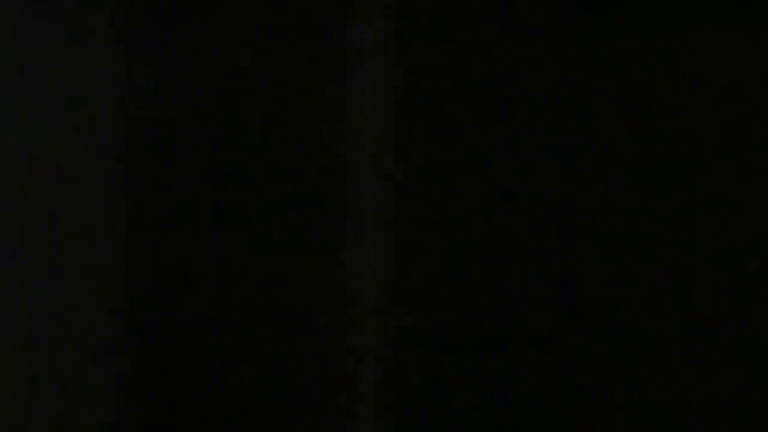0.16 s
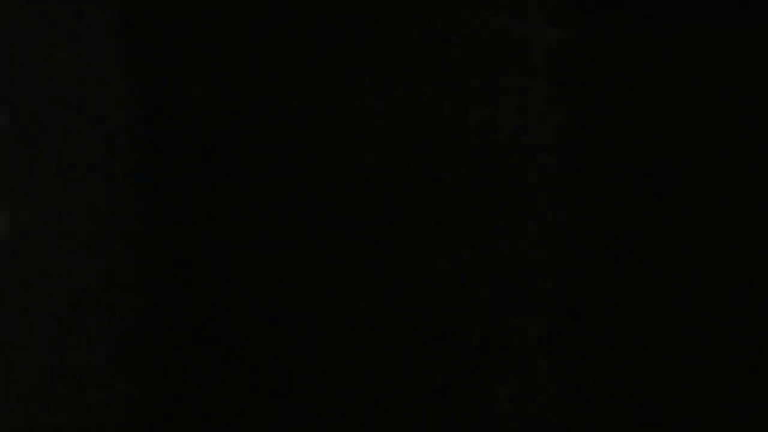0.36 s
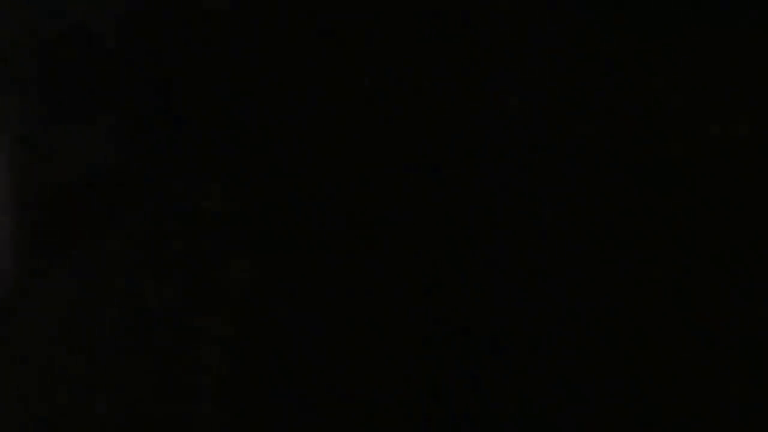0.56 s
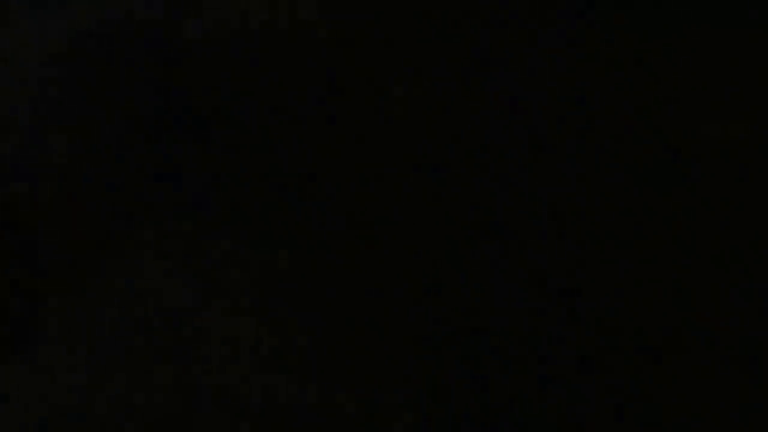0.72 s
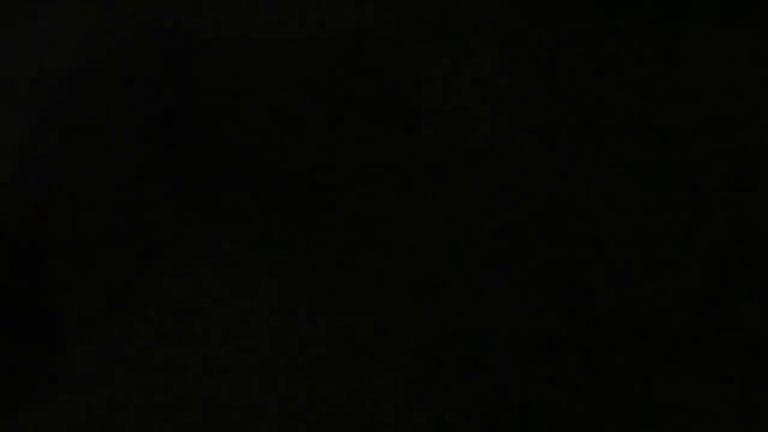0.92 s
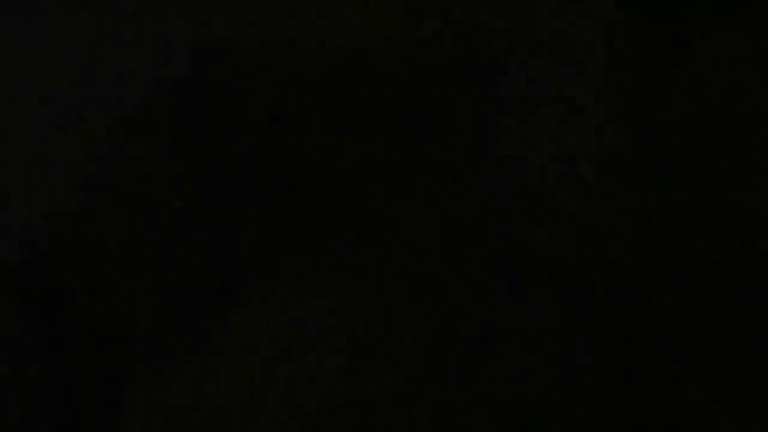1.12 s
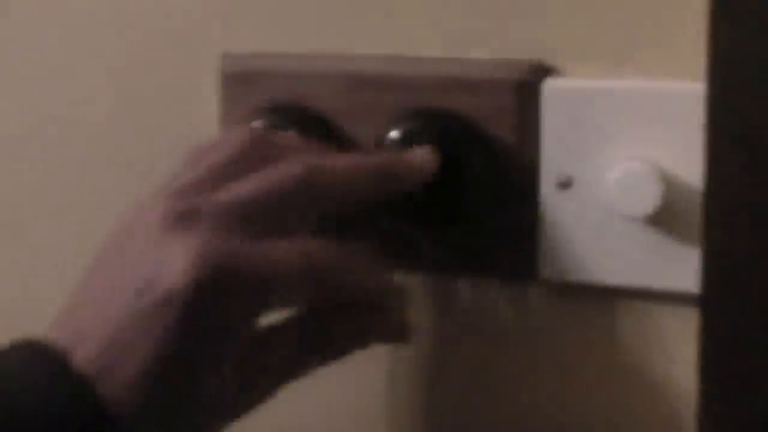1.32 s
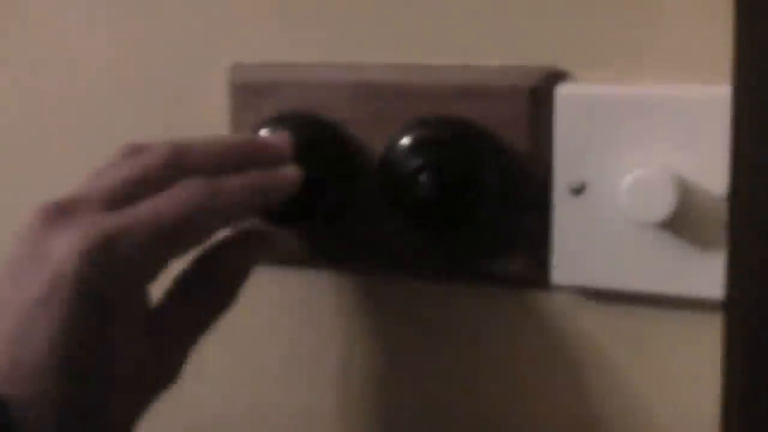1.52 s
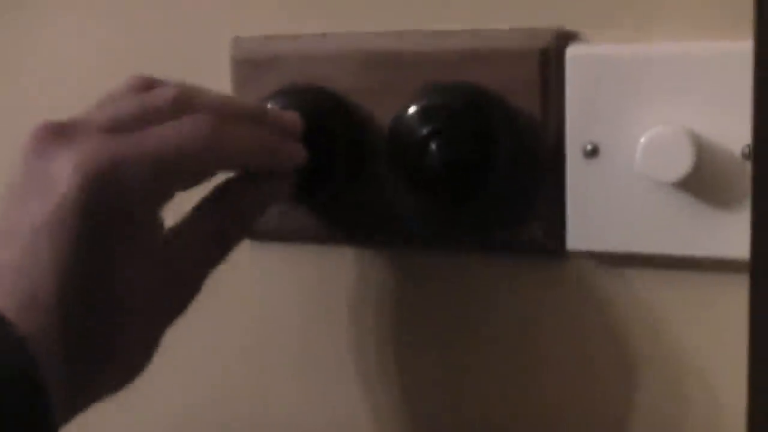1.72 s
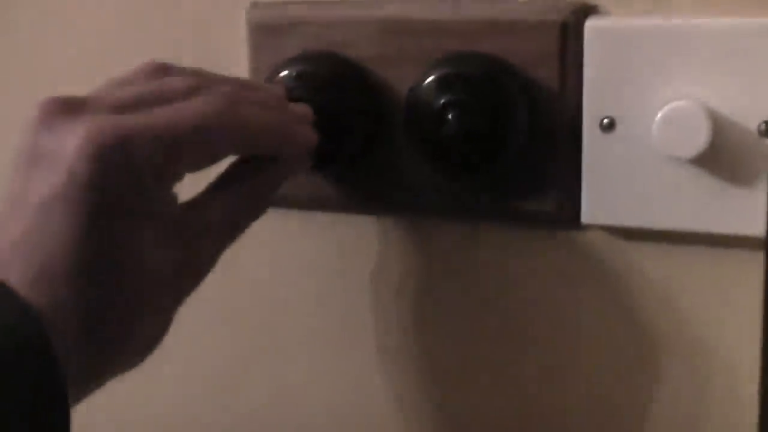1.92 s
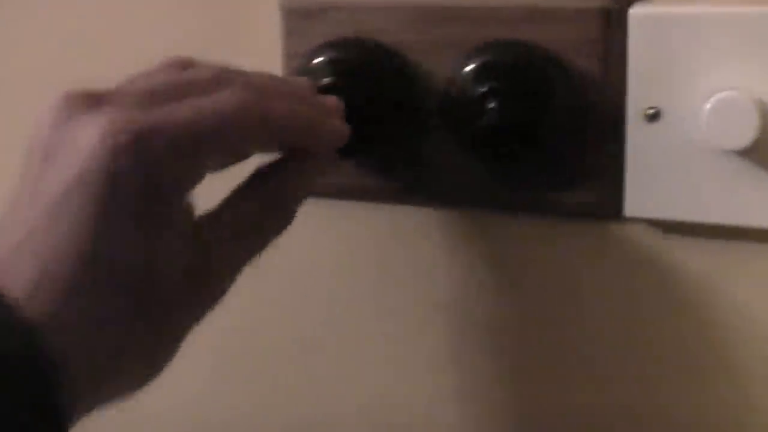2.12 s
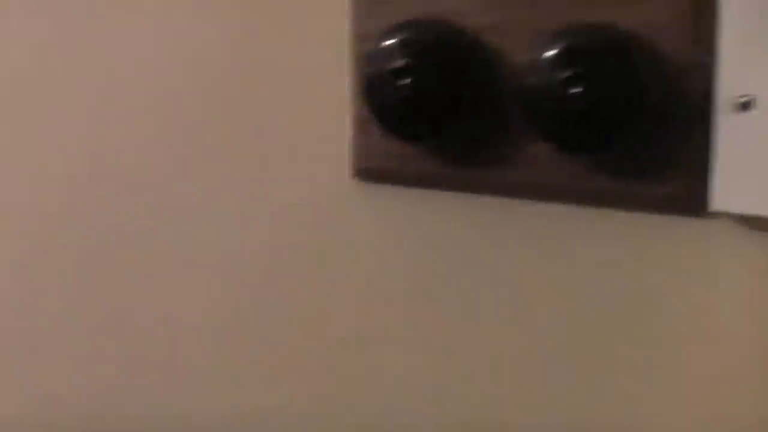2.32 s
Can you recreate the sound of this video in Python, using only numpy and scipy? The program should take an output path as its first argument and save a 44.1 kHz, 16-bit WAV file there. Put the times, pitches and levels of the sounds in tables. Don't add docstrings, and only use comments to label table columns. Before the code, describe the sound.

Sharp clicks of an old light switch, with sleeve rustle and hand knocks before them

```python
import sys
import numpy as np
from scipy import signal
from scipy.fft import irfft
from scipy.io import wavfile
from scipy.ndimage import uniform_filter1d, minimum_filter1d

SR = 44100
rng = np.random.default_rng(int(sys.argv[2]) if len(sys.argv) > 2 else 0)


def gain_from_db(level_db):
    decades = np.asarray(level_db, float) / 20
    return 10 ** decades


def output_pcm(signal):
    pcm = np.clip(np.atleast_2d(signal).T, -1, 1) * 32767
    wavfile.write(sys.argv[1], SR, np.round(pcm).astype(np.int16))


N = 104296

# pitch_hz, density_db_per_hz
HUSH = [(15, -50), (50, -14), (100, -18.5), (195, -12), (309, -20.5), (2160, -25), (2480, -35),
        (2760, -25.5), (14400, -47), (16000, -52)]
HUSH_DB = -56
# time_s, level_db
SLEEVE = [(0, -45), (.075, -46), (.1, -45.5), (.21, -45.5), (.3, -47.5), (.37, -51), (.5, -52),
          (.525, -48.5), (.72, -49.5)]
# pitch_hz, density_db_per_hz
CLOTH = [(180, -28), (300, 3), (366, -0.5), (1100, -5), (1810, -2.5), (2400, -3), (4230, -6), (7820, -12),
         (16000, -24.5)]
# pitch_hz, width_hz, gain, start_s, end_s
FOLDS = [
    (1780, 300, 1.5, 0.18, 0.342),
    (1620, 170, 1.7, 0.314, .5),
    (3330, 230, 1.3, 0.07, 0.327),
    (4300, 200, 1.8, .08, .36),
    (8400, 1060, 1.2, 0.074, 0.297),
    (2720, 1050, 0.83, 0.523, 0.75),
]
FOLD_EASE_S = 0.02
# time_s, level_db
SWIPE = [(0.62, -78), (0.674, -54.5), (0.766, -42), (0.838, -42), (1.0, -56.5)]
# pitch_hz, density_db_per_hz
SKIN = [(180, -25), (300, -23), (1140, -12), (1480, -10.5), (1690, -5.5), (1840, -12.5), (2140, -6),
        (8790, -23), (16000, -37.5)]
# pitch_hz, width_hz, level_db
WALL = [(990, 75, -17), (1460, 77, -11), (1862, 82, -4), (1996, 92, -11.5), (2700, 130, -6.5),
        (2960, 230, -7)]
# start_s, level_db, patch_hz, patch_db, patch_t60_s
KNOCKS = [(0.039, -37, 150.4, -2.5, 0.17), (0.111, -38.5, 1100, 25, 0.0058), (.145, -51, 800, 21.5, 0.025),
          (0.3644, -27, 563, 1.5, 0.031), (.367, -36, 1036, 8, .03), (.372, -35, 141, 6.5, 0.092),
          (0.386, -32.5, 300, -2.5, 0.046), (0.402, -33, 490, 0, 0.034), (0.415, -34.5, 180, 3.5, 0.062),
          (0.421, -24.5, 630, 6.5, 0.013), (.424, -42, 1170, 12, .03), (.428, -30, 165, 2, .08),
          (.441, -31, 470, 8, 0.038), (.454, -30, 620, 2, 0.028), (.458, -29.5, 390, 4, 0.082),
          (.467, -30.5, 170, 9, 0.028), (.485, -34, 276, 7.5, 0.092), (0.504, -37.5, 337, 1, 0.053),
          (0.527, -41.5, 200, 3, 0.067), (0.6, -45, 800, 13, 0.023), (.603, -46, 880, 13, .044),
          (.612, -50, 887, 15, .044), (.624, -52, 1000, 14, .03), (.622, -46.5, 1460, 13, 0.044),
          (0.744, -43.5, 990, 15.5, 0.061), (1.295, -49.5, 650, 22.5, 0.038), (1.363, -44, 279, 18, 0.031),
          (1.97, -42, 402, 6, 0.12), (2.03, -47, 400, 8, 0.1), (2.06, -48, 308, 10, 0.13),
          (2.1, -50, 420, 10, .09)]
# pitch_hz, level_db, t60_s
PLATE = [(79.5, -3, 0.11), (127.5, -5, 0.059), (159.4, -4.5, 0.055), (247.3, -7.5, 0.089),
         (390, -5.5, 0.07), (478, -12.5, 0.056), (620, -1, 0.015), (182, -6, .08), (1100, -14, 0.02),
         (1618, -15, .03)]
MOST_CYCLES = 40
# pitch_hz, t60_s
HALL_T60 = [(200, 0.82), (600, 0.38), (1400, 0.68), (4000, 0.63), (10000, 0.47), (16000, 0.25)]
# pitch_hz, density_db_per_hz
HALL_COLOUR = [(100, -12), (300, -5.5), (1000, -2.5), (2000, -8), (4200, -3), (8700, -11), (12500, -16.5),
               (16000, -12.5)]
EARLY_DB, EARLY_T60_S, HALL_SIDE_DB = -1, 0.091, -8.5
BUILD_S = 0.044
# start_s, level_db, lever_hz, contact_hz, shell_db
TICKS = [(0.0652, -32.5, 5900, 6400, -30), (0.0656, -27, 5000, 8800, -22), (0.07, -8, 4770, 4150, -16),
         (0.0707, -21, 6500, 8950, -12), (0.072, -23, 4600, 3700, -13), (0.074, -25, 2510, 3080, -20),
         (1.1840, -43, 4200, 6360, -6), (1.1865, -41, 4600, 6700, -4), (1.295, -56, 2500, 2600, -25),
         (1.2964, -5.5, 4140, 3000, -7), (1.2961, -10, 3960, 2640, -4.5), (1.2969, -18.5, 2030, 10500, 0),
         (1.2971, -14, 6610, 6550, -3), (1.2977, -10.5, 3900, 8600, -17), (1.2993, -24, 4200, 6600, -21),
         (1.3043, -24, 4200, 7000, -14), (1.7602, -39.5, 3840, 7760, -7), (1.7610, -37, 3230, 5170, -11),
         (1.7614, -41, 1870, 8000, -5), (1.966, -10, 4330, 5500, -10), (1.9665, -10, 3600, 2900, -18),
         (1.9674, -18, 1400, 5500, -11), (1.9674, -7.5, 3750, 6400, -3), (1.968, -12.5, 3500, 6700, -6),
         (1.971, -37, 3700, 6800, -15), (1.9792, -34, 4000, 6800, -14)]
LEVER_T60_S, CONTACT_T60_S, CONTACT_DB, TICK_PAN_DB = 0.0063, 0.0032, 2, 1.8
# pitch_hz, level_db, t60_s
SHELL = [(1400, -15.5, 0.0083), (2390, -10.5, 0.0014), (5500, 7, 0.00084), (7100, -31, 0.0011),
         (9080, 0.5, 0.0027), (10900, -4.5, 0.004), (13300, -3, 0.0026)]
# start_s, level_db, cap_hz, cap_gain, tilt_db_per_octave
SNAPS = [
    (0.069, 1, 8500, 0.88, 1.1),
    (1.187, -32.5, 6500, 0.68, 6),
    (1.297, 7, 8330, 4.3, -0.07),
    (1.762, -48, 7940, .5, 13),
    (1.968, 6.5, 6800, 1.7, 1.53),
]
CAP_WIDTH_HZ, BASE_HZ, BASE_WIDTH_HZ, BASE_GAIN = 2040, 4200, 320, 2.46
# time_s, pitch_hz, level_db
WHINE = [(0.98, 2490, -54), (1.08, 2585, -57), (1.159, 2545, -58.5), (1.2, 2494, -50.5), (1.295, 2510, -55),
         (1.42, 2440, -71), (1.55, 2390, -65), (1.58, 2410, -58.5), (1.63, 2490, -54.5), (1.84, 2444, -55),
         (1.865, 2440, -63), (1.96, 2440, -63), (2.05, 2430, -74), (2.22, 2380, -74), (2.27, 2380, -57),
         (2.32, 2436, -53.5), (2.37, 2420, -54)]
WHINE_WIDTH_HZ, WHINE_PAN_DB = 67, -6.5
STEADY = 0.8
# time_s, left_minus_right_db
HAND = [(0, -1), (.05, 1.5), (.27, 3.5), (.43, -1), (.58, -2.5), (.8, -2), (1.1, -2.5), (1.3, -0.5),
        (1.4, 1), (1.75, -7), (2, 0), (2.36, -3)]
BASS_CUT_HZ = 121
NOTCH_HZ, NOTCH_WIDTH_HZ, NOTCH_DEPTH = 9380, 250, 0.7
LIMIT_DB, SQUEEZE, ATTACK_S, HOLD_S, RELEASE_DB_PER_S = -26, 0.74, 0.0064, 0.037, 389


def evened(x):
    return x / np.sqrt(np.mean(x ** 2) + 1e-20)


def read(points, hz):
    f, value = np.transpose(points)
    return np.interp(np.log(hz + 1), np.log(f + 1), value)


def follow(curve, column=1, fade_db_per_s=150):
    t, c = np.arange(N) / SR, np.array(curve)
    outside_s = np.maximum(c[0, 0] - t, 0) + np.maximum(t - c[-1, 0], 0)
    return gain_from_db(np.interp(t, c[:, 0], c[:, column]) - fade_db_per_s * outside_s)


def add(mix, s, sound):
    part = mix[:, round(s * SR):][:, :sound.shape[1]]
    part += sound[:, :part.shape[1]]


def panned(x, pan_db):
    return x * gain_from_db(np.array([[0.5], [-0.5]]) * pan_db)


def ring(modes, length_s, spread=0.0, soft_s=0.0001):
    t = np.arange(0, length_s, 1 / SR)
    out = np.zeros(len(t))
    for hz, db, t60 in modes:
        level_turn, phase_turn = rng.uniform(-1, 1, 2)
        decay = gain_from_db(db + 4.8 * spread * level_turn - 60 * t / t60)
        out += decay * np.sin(2 * np.pi * hz * t + 3 * spread * phase_turn)
    return out * (1 - np.exp(-t / soft_s))


def resonate(x, hz, width):
    turn = np.exp(2j * np.pi * np.cumsum(hz * np.ones(N)) / SR)
    r = np.exp(-np.pi * width / SR)
    return 2 * (turn * signal.lfilter([1 - r], [1, -r], x / turn)).real


def noise(colour, side_db, patchy_db):
    hz = np.fft.rfftfreq(512, 1 / SR)
    a, b, c, d, patches = rng.standard_normal((N // 128 + 5, 257, 5)).T
    patches = uniform_filter1d(patches, size=5, axis=0)
    patches = evened(uniform_filter1d(patches, size=8, axis=1))
    mid, side = a + 1j * b, gain_from_db(side_db) * (c + 1j * d)
    z = np.array([mid + side, mid - side]) * gain_from_db(read(colour, hz)[:, None] + patchy_db * patches)
    return evened(signal.istft(z, nperseg=512, noverlap=384)[1][:, :N])


def room_hush():
    return gain_from_db(HUSH_DB) * noise(HUSH, side_db=-3, patchy_db=2.5)


def rubbing():
    t = np.arange(N) / SR
    cloth = noise(CLOTH, side_db=-7.5, patchy_db=2.0)
    folds = 0
    for hz, width, gain, start, end in FOLDS:
        tightness = np.clip(np.minimum(t - start, end - t) / FOLD_EASE_S + 0.5, 0, 1)
        folds = folds + gain * tightness * resonate(cloth, hz, width)

    skin = noise(SKIN, side_db=-10.0, patchy_db=0.6)
    catches = rng.random(N) < 6000 / SR
    strength = gain_from_db(1.5 * np.minimum(rng.exponential(1, N), 3))
    mid, side = rng.standard_normal((2, N)) * strength * catches
    slips = mid + gain_from_db(-10) * side * np.array([[1], [-1]])
    rung = 0
    for hz, width, db in WALL:
        patch = resonate(resonate(slips, hz, width), hz, 2 * width)
        rung = rung + gain_from_db(db) * evened(patch)
    return follow(SLEEVE) * gain_from_db(3.5) * (cloth + folds) + follow(SWIPE) * gain_from_db(8.0) * (skin + rung)


def hall(x):
    taps = np.zeros((2, SR))
    at = np.arange(160, SR - 10, 10)
    at = at + rng.integers(0, 10, (2, len(at)))
    np.put_along_axis(taps, at, rng.choice([-1., 1.], at.shape), axis=1)
    hz, t, z = signal.stft(taps, SR, nperseg=128)
    late = gain_from_db(-60 * t / read(HALL_T60, hz)[:, None]) * (1 - np.exp(-t / BUILD_S))
    early = gain_from_db(EARLY_DB - 60 * t / EARLY_T60_S)
    mid, side = signal.istft(z * (late + early), SR, nperseg=128)[1]
    side = side * gain_from_db(HALL_SIDE_DB)
    echoes = np.array([mid + side, mid - side]) / np.linalg.norm(mid)
    return signal.fftconvolve(x[None], echoes, axes=1)


def knocks():
    out = np.zeros((2, N))
    for s, db, hz, patch_db, t60 in KNOCKS:
        patch = (hz, patch_db, min(t60, MOST_CYCLES / hz))
        blow = ring(PLATE + [patch], 0.33, spread=0.33, soft_s=0.00094)
        add(out, s, gain_from_db(db) * blow[None])
    return out + gain_from_db(-11.5) * hall(out[0])[:, :N]


def switch():
    out = np.zeros((2, N))
    for s, db, lever_hz, contact_hz, shell_db in TICKS:
        tick = ring([(lever_hz, 0, LEVER_T60_S), (contact_hz, CONTACT_DB, CONTACT_T60_S)], 0.02)
        tick = tick + gain_from_db(shell_db) * ring(SHELL, 0.02, spread=0.3)
        pan_db = TICK_PAN_DB + 5.9 * rng.uniform(-1.1, 1)
        add(out, s, panned(gain_from_db(db) * tick, pan_db))

    hz, middle_s = np.fft.rfftfreq(256, 1 / SR), 128 / SR
    for s, db, cap_hz, cap_gain, tilt_db in SNAPS:
        cap = cap_gain / (1 + ((hz - cap_hz) / CAP_WIDTH_HZ) ** 2)
        base = BASE_GAIN / (1 + ((hz - BASE_HZ) / BASE_WIDTH_HZ) ** 2)
        tilt = tilt_db * np.log2((hz + 1) / BASE_HZ)
        colour = (1 + cap + base) * gain_from_db(read(HALL_COLOUR, hz) + tilt)
        click = np.fft.fftshift(irfft(colour)) / np.sqrt(np.mean(colour ** 2))
        add(out, s - middle_s, gain_from_db(db) * hall(click))
    return out


def motor():
    s, hz, _ = np.transpose(WHINE)
    hz = np.interp(np.arange(N) / SR, s, hz)
    x = noise([(100, 0), (16000, 0)], side_db=-10, patchy_db=1.5)
    pair = resonate(x, hz - 55, WHINE_WIDTH_HZ) - resonate(x, hz + 55, WHINE_WIDTH_HZ)
    tone = resonate(pair, hz, 3 * WHINE_WIDTH_HZ)
    wander = abs(uniform_filter1d((tone ** 2).mean(0), size=900)) + 1e-12
    return follow(WHINE, column=2) * evened(tone / wander ** (STEADY / 2))


def scene():
    bass_cut = signal.butter(3, BASS_CUT_HZ, "high", fs=SR, output="sos")
    blows = signal.sosfilt(bass_cut, knocks() + switch())
    lean_db = np.interp(np.arange(N) / SR, *np.transpose(HAND))
    return room_hush() + panned(rubbing() + blows, lean_db) + panned(motor(), WHINE_PAN_DB)


def band_limit(x):
    return signal.sosfilt(signal.butter(12, 15700, fs=SR, output="sos"), x)


def record(dry):
    x = dry - NOTCH_DEPTH * resonate(dry, NOTCH_HZ, NOTCH_WIDTH_HZ)
    power = abs(uniform_filter1d((x ** 2).mean(0), size=221))
    over_db = np.maximum(10 * np.log10(power + 1e-12) - LIMIT_DB, 0)
    hold, attack = round(HOLD_S * SR / 2), round(ATTACK_S * SR)
    held_db = np.roll(-minimum_filter1d(-over_db, size=2 * hold + 1), hold + attack)
    release_db = np.arange(N) * RELEASE_DB_PER_S / SR
    cut_db = np.maximum.accumulate(held_db + release_db) - release_db
    cut_db = uniform_filter1d(cut_db, size=attack)
    return band_limit(x * gain_from_db(-SQUEEZE * cut_db))


dry = scene()
out = record(dry)
output_pcm(out)
```